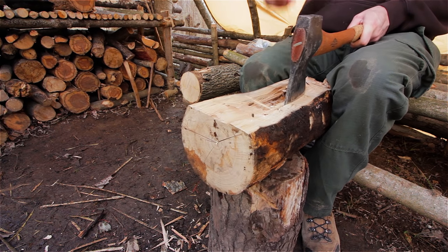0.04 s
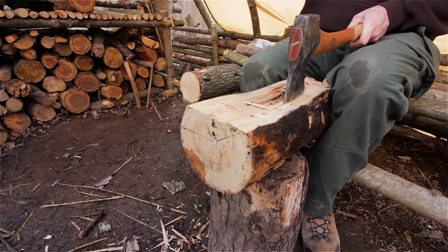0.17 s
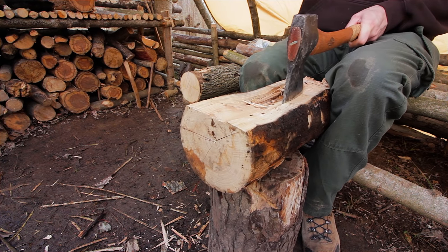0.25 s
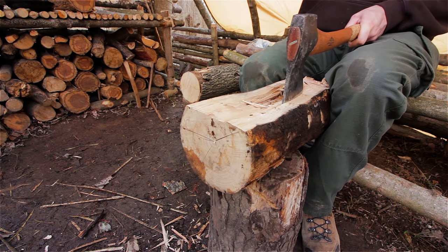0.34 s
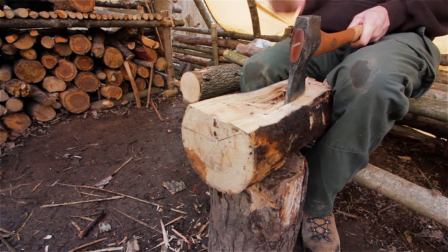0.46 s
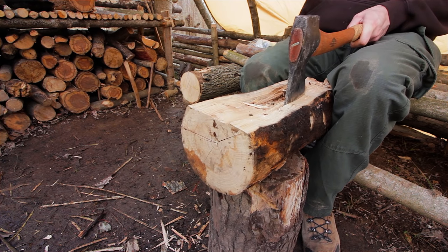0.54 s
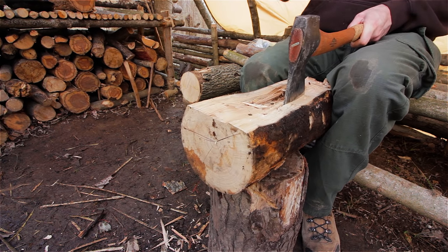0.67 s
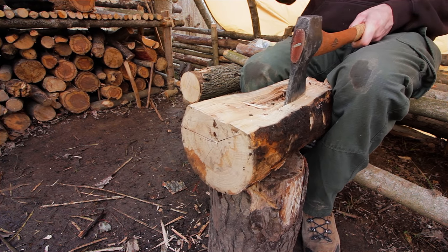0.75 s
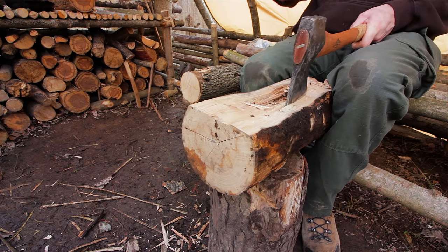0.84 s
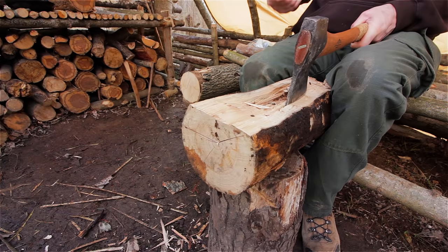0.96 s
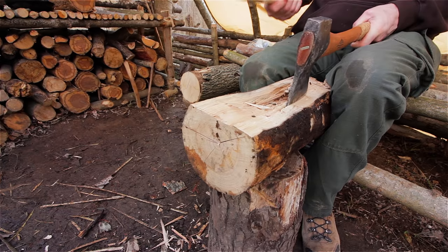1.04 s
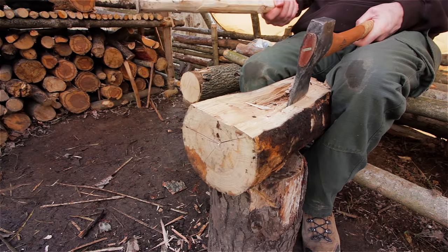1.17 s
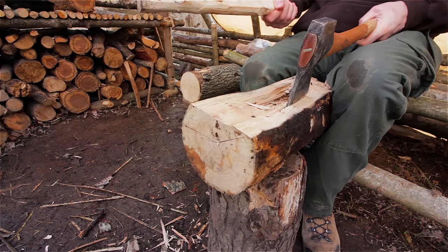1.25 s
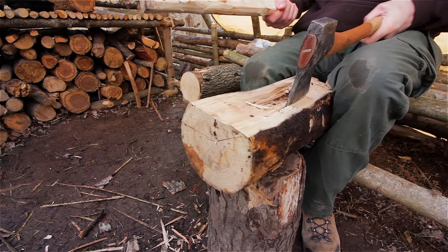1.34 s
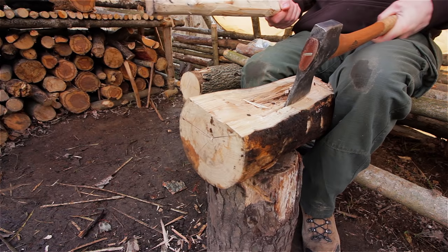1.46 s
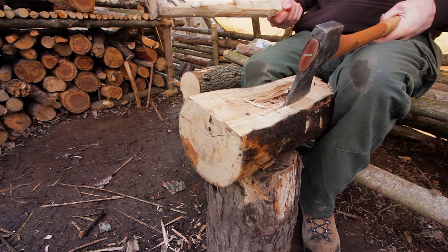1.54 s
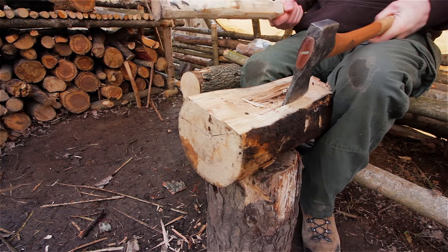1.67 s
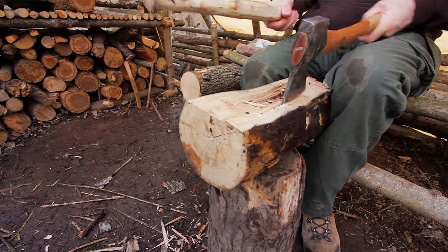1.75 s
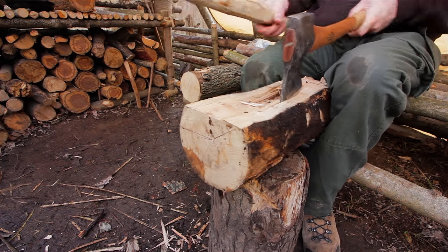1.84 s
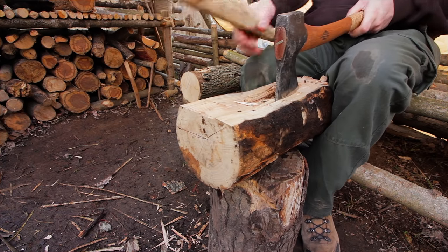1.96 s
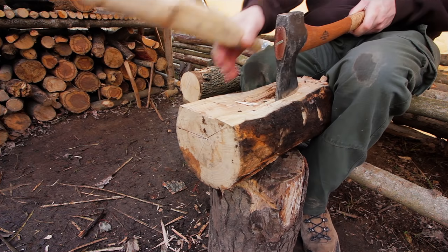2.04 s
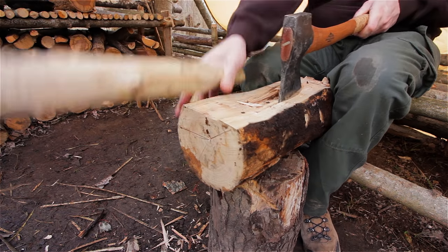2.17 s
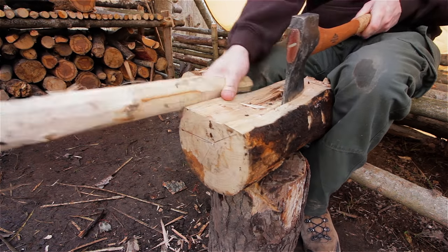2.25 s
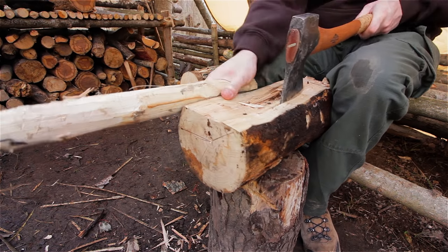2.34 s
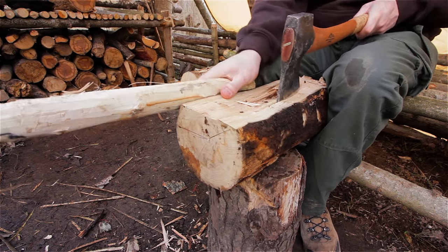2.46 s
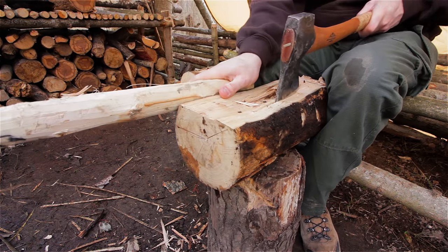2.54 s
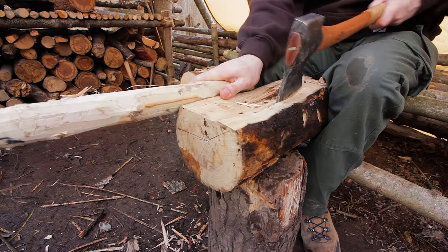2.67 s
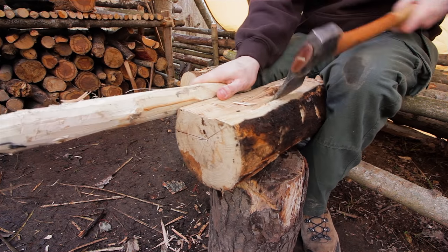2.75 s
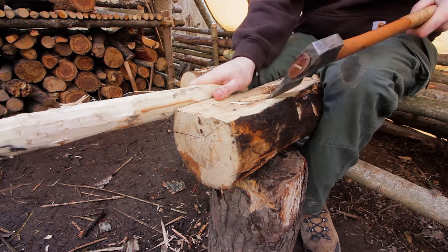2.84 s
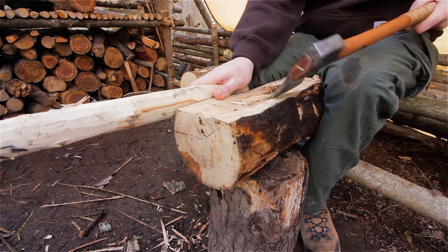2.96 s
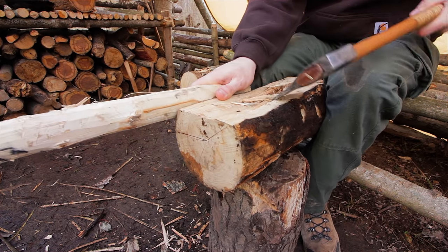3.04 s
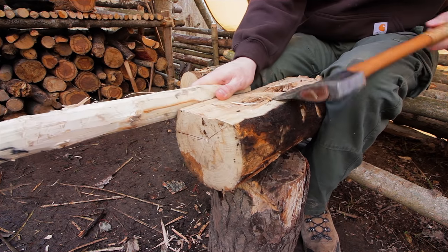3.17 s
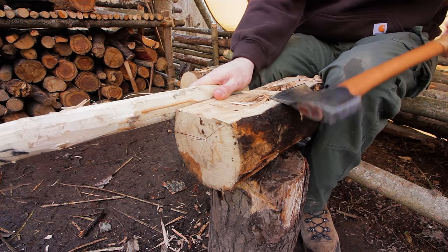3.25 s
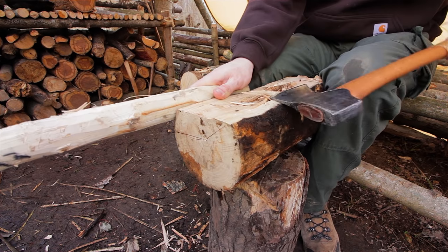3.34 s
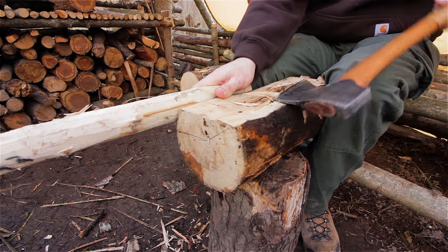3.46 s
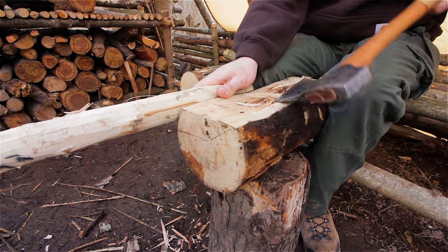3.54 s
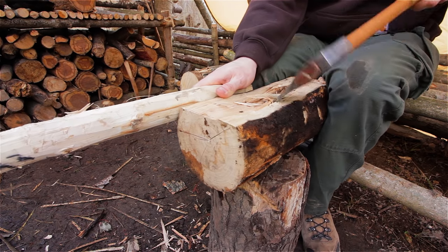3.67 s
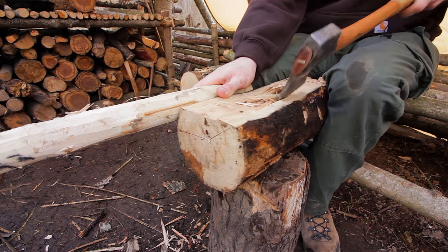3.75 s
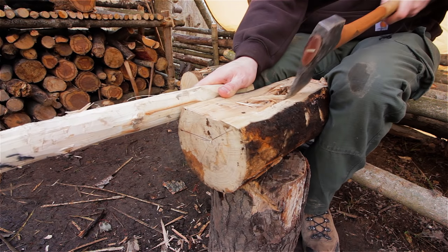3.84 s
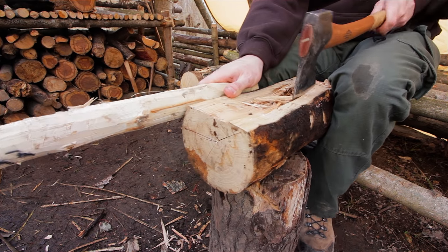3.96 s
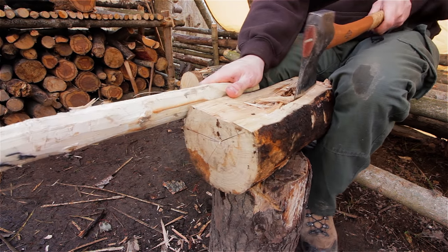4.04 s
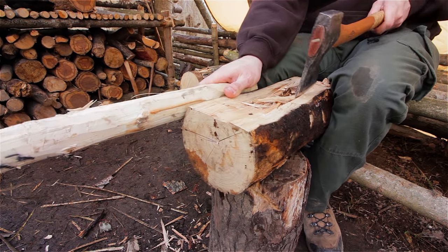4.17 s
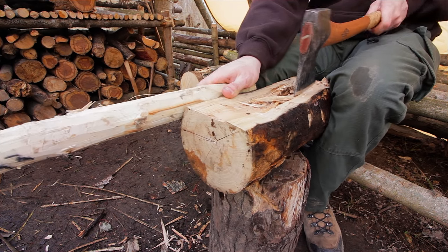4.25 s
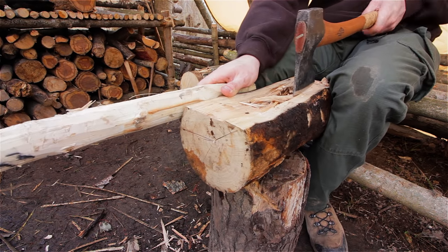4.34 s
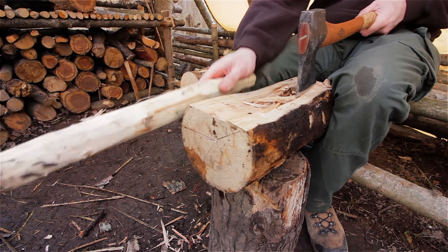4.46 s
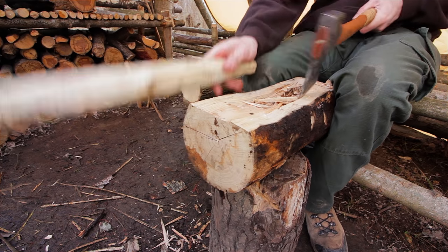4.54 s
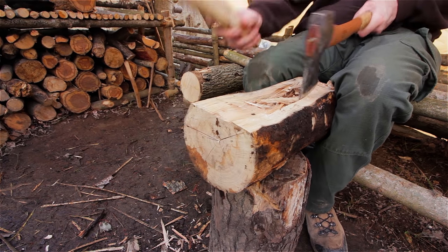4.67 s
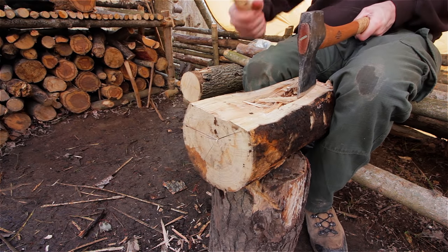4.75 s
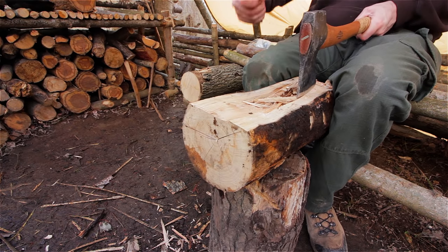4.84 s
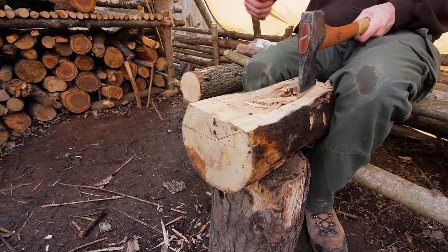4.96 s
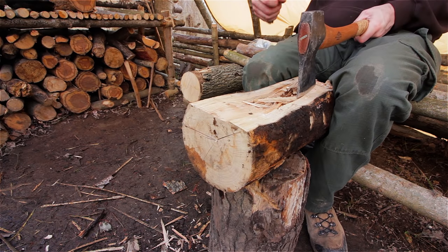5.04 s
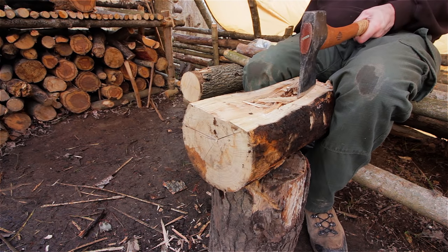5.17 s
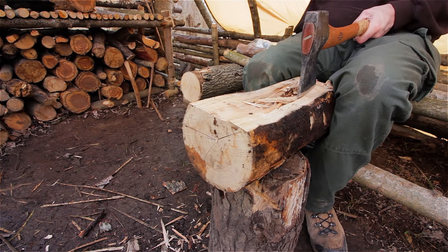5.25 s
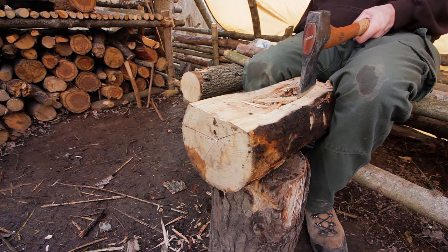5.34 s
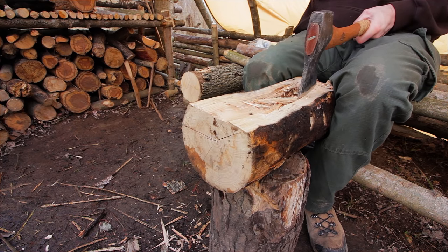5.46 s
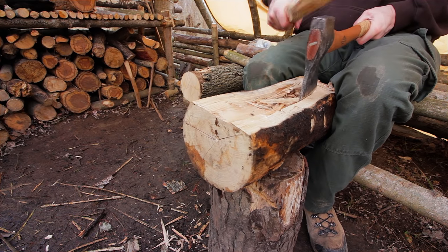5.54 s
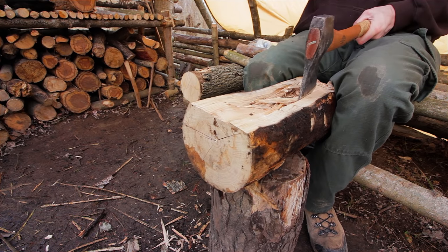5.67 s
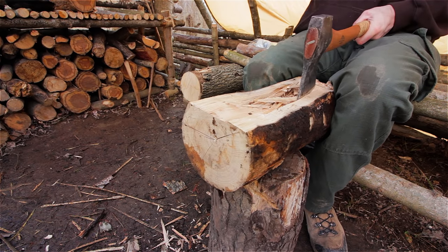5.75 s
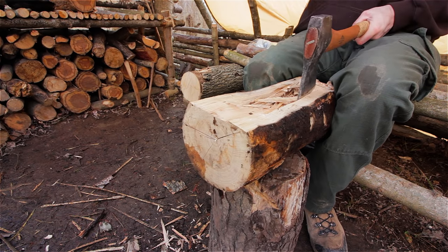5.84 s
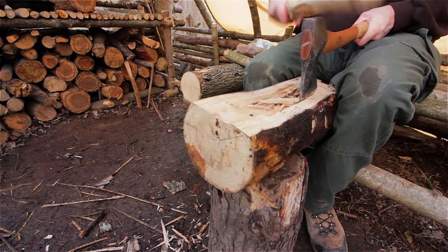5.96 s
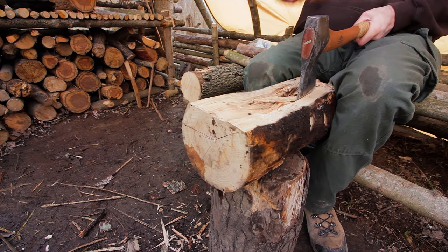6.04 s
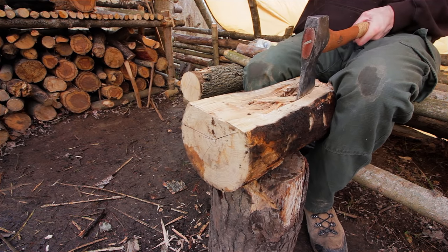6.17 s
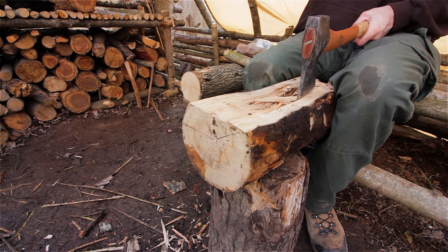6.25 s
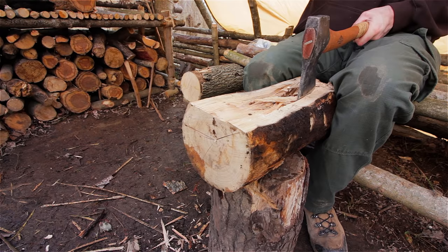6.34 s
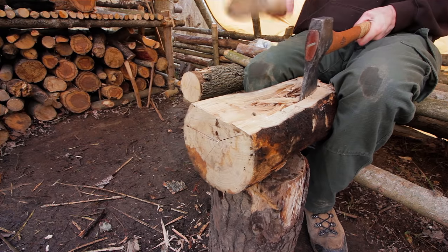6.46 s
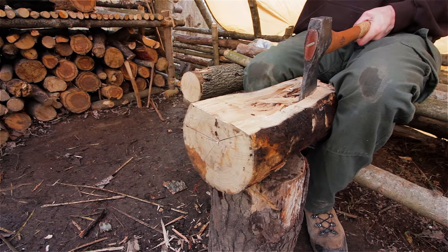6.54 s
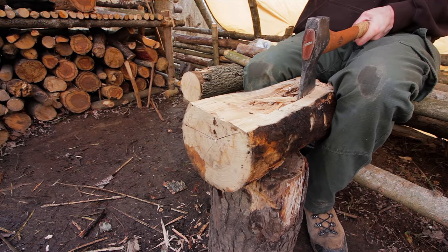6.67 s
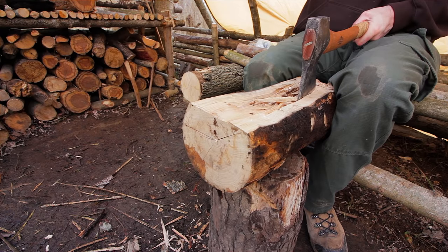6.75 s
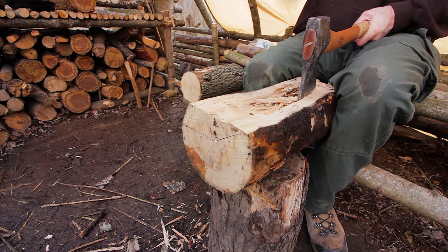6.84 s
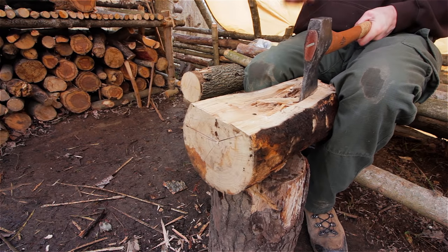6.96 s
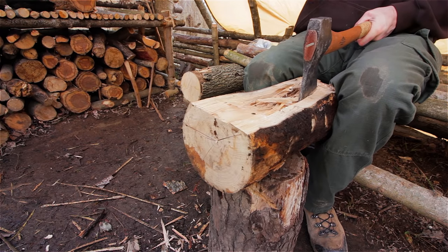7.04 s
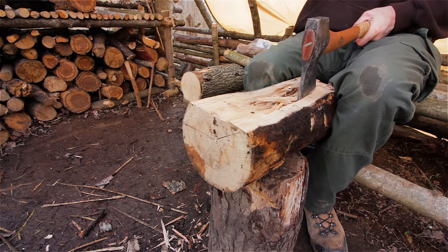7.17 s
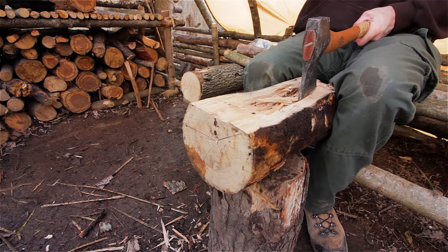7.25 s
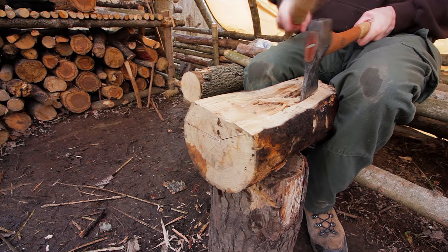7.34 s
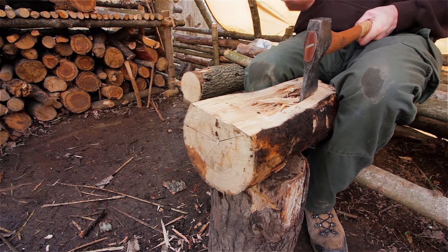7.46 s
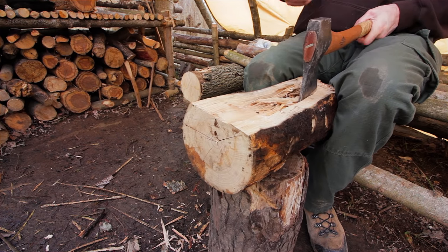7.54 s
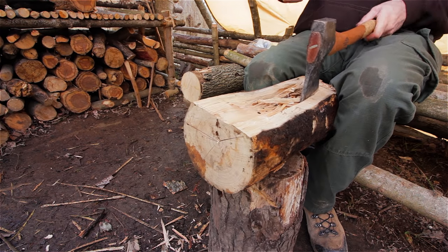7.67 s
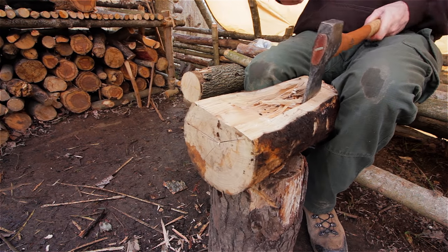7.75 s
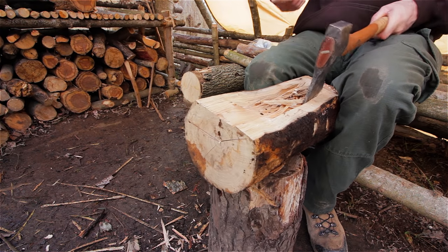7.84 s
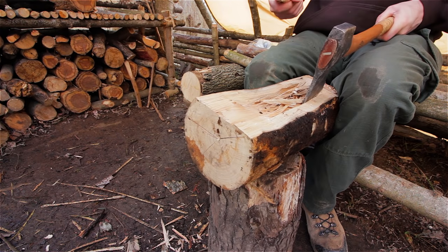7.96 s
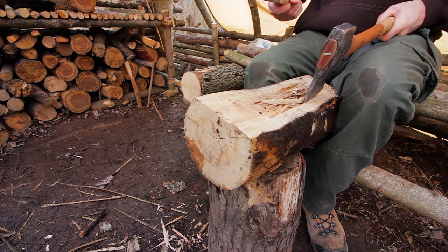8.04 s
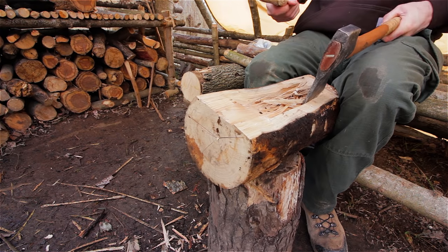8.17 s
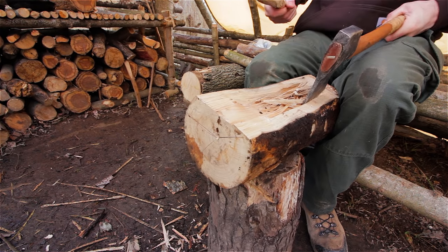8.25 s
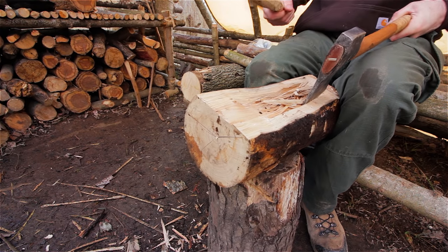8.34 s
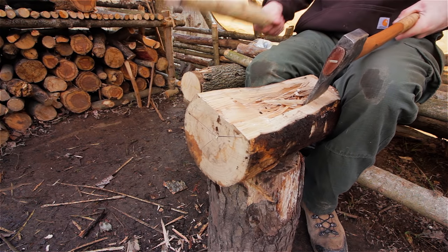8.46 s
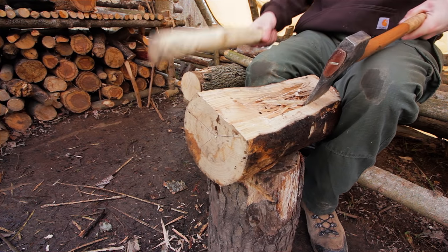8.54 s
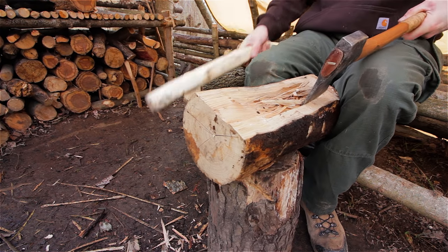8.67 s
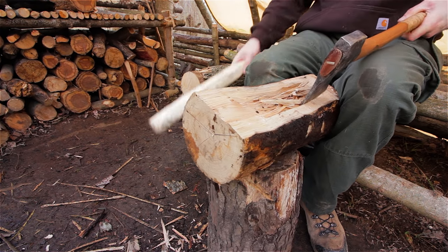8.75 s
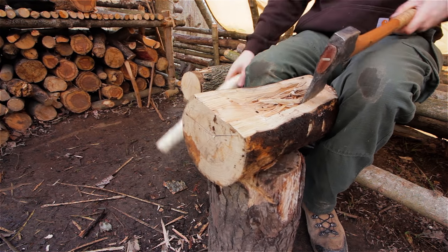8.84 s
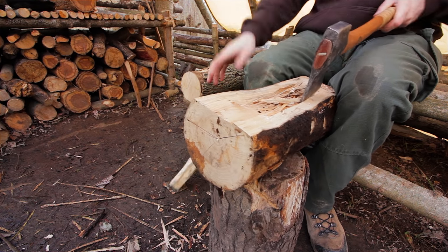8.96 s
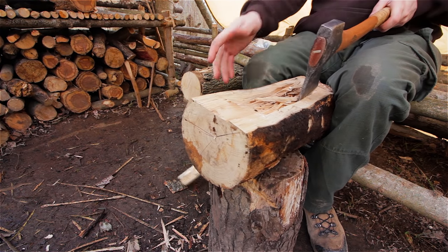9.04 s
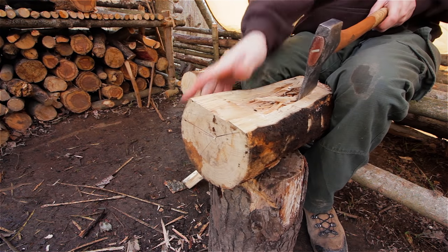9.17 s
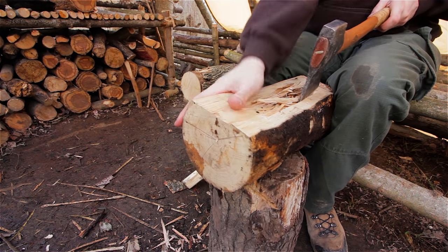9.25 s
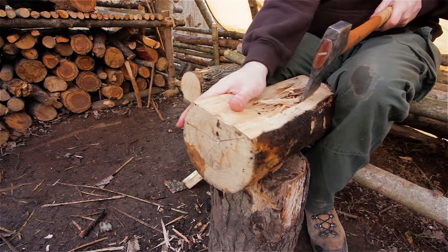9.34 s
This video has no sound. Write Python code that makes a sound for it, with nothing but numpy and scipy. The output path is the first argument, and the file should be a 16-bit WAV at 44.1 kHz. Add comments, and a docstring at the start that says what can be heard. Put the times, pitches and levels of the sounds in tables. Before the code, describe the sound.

The fading echo of an earlier blow leads into two hard wooden whacks at about 0.05 and 0.5 s, a baton driving a hatchet into a log. They are loud, short, mid-pitched and slightly overloaded, with dull shelter reflections and a diffuse tail from trees. The background ducks and slowly returns: faint rumble, low hum, cloth rustle. Tiny knocks come at 1.5-1.8 s, then a dull thud at 2.3 as the baton is laid down. Sharp splintering cracks burst at 2.7-2.85 s, with a faint blade scrape at 3.1 and more snaps around 3.25. Sleeve brushes and a soft hand slide follow until 5.2. Five more blows land near 5.6, 6.0, 6.5, 6.95 and 7.4 s. After quiet rustling, the baton drops at 9.05-9.25 with a knock and brighter, hollow clatter, and a brief rising squeak of the blade begins around 9.35.

```python
"""The last echo of a blow just past leads into two hard blows: a wooden baton drives a hatchet into a log.
The log, the baton and the blade's squeak are made of decaying or gliding tones; a chip levered out with
sharp cracks is bursts of noise. Five more blows follow, and the baton is dropped. Shaped noise makes the
cloth rustle, the distant rumble, the shelter's reflections and the echo from the trees. Blows overload the
sound, the gain ducks, and the background slowly returns."""
import sys
import numpy as np
from scipy import signal
from scipy.fft import rfft, irfft
from scipy.io import wavfile
from scipy.ndimage import uniform_filter1d

SR = 44100
rng = np.random.default_rng(int(sys.argv[2]) if len(sys.argv) > 2 else 0)


def ratio(d):
    """dB to gain"""
    e = np.asarray(d, float) / 20
    return 10 ** e


def unload_audio(sound):
    """Save the sound as a 16-bit wav file, at the path given as the first command line argument."""
    columns = np.transpose(np.atleast_2d(sound))
    # keep every value between -1 and 1, then stretch to whole-number steps
    steps = np.round(np.clip(columns, -1, 1) * 32767)
    wavfile.write(sys.argv[1], SR, steps.astype(np.int16))


N = 414540

# baton hitting the back of the hatchet: [t/s, force level/dB, rebound level/dB, sharpness level/dB]
HATCHET_BLOWS = [(0.0502, 27, -5, 3), (.4716, 24.5, -2, 1), (5.6056, 21, -8.5, 1), (6.04, 20.5, -3.5, -0.5),
                 (6.4742, 26, -6.5, -1.5), (6.9509, 24, -3.5, -3.5), (7.4057, 26.5, -4.5, -1.5)]
# ringing tones of log, stump and hatchet: [f/Hz, level/dB, t60/s before each touch scales it]
LOG_MODES = [(275.4, -11, 0.035), (394, -1.5, 0.099), (460, -4, 0.018), (560.5, 2.5, 0.059),
             (639, -1.5, 0.06), (775, -2.5, 0.088), (932.6, -2, 0.03), (1081, -3.5, 0.091),
             (1190, -4, 0.024), (1395, -2, 0.029), (1570, -6, 0.084), (1929, -5, 0.057),
             (2215, -4.5, 0.096), (2530, -10.5, 0.026), (3143, -13, 0.01), (3530, -8, 0.038),
             (4120, -18, 0.017), (7150, -19.5, 0.037)]
# colour of the contact noise in a blow: [f/Hz, level/dB per Hz]
SLAP_COLOUR = [(59, -36.5), (100, -20.5), (524, -3), (1830, -3.5), (2520, -10), (3540, -9), (3940, -21.5),
               (16000, -40)]
# ringing tones of the free baton: [f/Hz, level/dB, t60/s before the grip scales it]
BATON_MODES = [(205, -15, .3), (404, -15, .2), (560, -12, .08), (711, -6, .07), (931, 1, .22),
               (1066, 0, .13), (1308, -13, .12), (1480, -12, .12), (1922, -13, .16), (2196, -7, .1),
               (3150, -15, .07), (3450, -22, .07), (4490, -28, .05), (4780, -20, .05)]
# baton touching wood or soil: [t/s, level/dB, freedom to ring 0-1, contact cut-off f/Hz, log answer level/dB]
BATON_KNOCKS = [(1.481, -39, 0.5, 2000, 16), (1.548, -35, 1, 2000, 9), (1.789, -32, 0.7, 700, 4),
                (2.288, -11.5, 0.03, 1130, 11), (9.0549, -11, 0.16, 3180, 10.5), (9.156, 0.5, 1, 3340, -6),
                (9.191, -2, 0.76, 1460, -3.5), (9.244, -28, 0.66, 2920, -3)]
# a hand sliding along the baton: [t/s, length/s, level/dB]
HAND_SLIDES = [(4.745, .09, -38.5), (5.045, .085, -48)]
# wood fibres snapping: [t/s, level/dB before a common trim, centre f/Hz]
FIBRE_CRACKS = [(1.8873, -34.5, 9960), (1.9041, -36, 5940), (2.425, -29.5, 3986), (2.7076, -14, 3650),
                (2.7631, -21, 3830), (2.7741, -17.5, 8210), (2.79, -12.5, 5000), (2.7926, 9, 3460),
                (2.8009, -1, 5200), (2.805, -0.5, 3300), (2.8112, -4, 3380), (2.8144, -0.5, 2930),
                (2.8301, -10.5, 6770), (2.8334, -7, 4060), (2.844, 7, 6780), (3.2136, -28, 3440),
                (3.2454, -26, 7730), (3.2531, -10.5, 3545), (3.264, 5.5, 6200), (3.329, -21, 5000),
                (3.3555, -13, 5605), (3.6871, -32, 3036), (3.7467, -33, 3200), (3.9957, -23.5, 5100),
                (5.5271, -40, 3420), (5.9558, -30, 3153)]
# loudness curve of moving cloth and hands: [t/s, level/dB]
RUSTLE_LEVELS = [(1.2, -59.5), (2.7, -57.5), (3.4, -56.5), (5.55, -63.5), (9.4, -61)]
# colour of cloth noise: [f/Hz, level/dB per Hz]
CLOTH_COLOUR = [(150, -32), (250, -0.5), (1240, -6.5), (1760, -8), (2440, -7), (3120, -8), (16000, -19.5)]
# path of the blade's squeak in the cut: [t/s, strongest partial f/Hz, level/dB]
SQUEAK_PATH = [(9.33, 1231, -54), (9.354, 1457, -32.5), (9.368, 1614, -44), (9.376, 1666, -35),
               (9.398, 1674, -31)]
# tones stacked in the squeak: [multiple of the strongest partial, level/dB]
SQUEAK_STACK = [(.5, -12.5), (1.0, 1.5), (1.5, -22), (2.0, -30)]
# colour of the distant rumble: [f/Hz, level/dB per Hz]
RUMBLE_COLOUR = [(15, -23.5), (25, -3.5), (43, -5.5), (102, 1), (175, -13.5), (249, -13.5), (677, -12.5),
                 (887, -9.5), (2220, -17.5), (3250, -24.5), (8590, -29.5), (14800, -29), (16000, -32)]
# wavering drone: [f/Hz, width of each of two filters/Hz, level/dB]
DRONE_BANDS = [(78, 7.9, -57.5), (156, 110, -56.5)]
# colour of the echo from the trees: [f/Hz, level/dB per Hz]
WOODS_COLOUR = [(150, -53), (250, -22), (521, -10.5), (747, -9), (868, -11.5), (1040, -0.5), (1600, -10),
                (1920, -3.5), (2590, -17.5), (3250, -17.5), (3890, -29), (9000, -43.5), (11700, -74),
                (19800, -120)]
# brushes of sleeve and hand: [t/s at the middle, length/s, level/dB, brightest f/Hz]
SLEEVE_BRUSHES = [(1.518, .16, -48, 1710), (2.385, 0.049, -43, 3000), (2.564, .08, -40.5, 3200),
                  (3.87, 0.26, -50, 5030), (4.18, .09, -47.5, 3540), (4.374, 0.065, -46.5, 2480),
                  (4.461, .06, -43.5, 4070), (4.575, .14, -46.5, 3480), (4.818, 0.086, -43.5, 5000),
                  (5.2, .06, -52, 4070), (8.2, .1, -53, 900), (8.31, 0.12, -52, 1500),
                  (8.465, .08, -50, 1510), (8.66, 0.066, -48, 2480), (8.948, 0.15, -52, 4000),
                  (9.334, 0.055, -47.5, 3550)]
# blade dragged over the log: [t/s, length/s, level/dB, ring f/Hz]
BLADE_SCRAPES = [(3.12, .06, -44, 377), (3.139, .095, -45.5, 1310)]

# a blow just before the start still echoes and holds the gain down
EARLIER_BLOW_S, EARLIER_FORCE_DB, EARLIER_DUCK_DB = 0.42, 29, 32.5


def rms_one(x):
    """Scale to rms 1, so that a level in dB can be set afterwards."""
    return x / np.sqrt(np.mean(x ** 2) + 1e-20)


def coloured(spectrum, size):
    """Noise of rms 1 whose spectrum follows (Hz, dB) points."""
    hz, db = np.transpose(spectrum)
    grid = np.fft.rfftfreq(size, 1 / SR) + 1
    gain = ratio(np.interp(np.log(grid), np.log(hz), db))
    return rms_one(irfft(rfft(rng.standard_normal(size)) * gain, size))


def drift(rate):
    """Random wander: straight lines between 2 * rate random points a second, which have spread 1."""
    points = rng.standard_normal(int(N / SR * 100))
    return np.interp(np.arange(N) / SR * rate * 2, np.arange(len(points)), points)


def resonance(x, hz, width_hz):
    """A band around hz, as from a ringing body: two poles, gain 1 on top."""
    r = np.exp(-np.pi * width_hz / SR)
    feedback = [1, -2 * r * np.cos(2 * np.pi * hz / SR), r * r]
    return signal.lfilter([(1 - r * r) / 2, 0, (r * r - 1) / 2], feedback, x)


def low_pass(x, cut_hz):
    """Dull the sound above cut_hz with a second-order filter."""
    return signal.sosfilt(signal.butter(2, min(cut_hz, SR / 2.3), fs=SR, output="sos"), x)


def struck(modes, t, freedom, scatter_db, shift=0):
    """A struck body: decaying tones with new strengths for every touch; peak 1."""
    hz, db, t60 = np.transpose(modes)[:, :, None]
    strength = ratio(db + scatter_db * rng.standard_normal(hz.shape))
    hz = hz * (1 + shift * rng.standard_normal(hz.shape))   # grip and depth of the cut move the tones
    decay = ratio(-60 * t / (t60 * freedom))
    ring = (strength * decay * np.sin(2 * np.pi * hz * t)).sum(axis=0)
    return ring / np.abs(ring).max()


def add(out, s, sound):
    """Mix a sound in at time s."""
    at = round(s * SR)
    out[at:at + len(sound)] += sound[:len(out) - at]


def blows():
    """The log rings under the blow and its rebound, a slap of noise sits on top; air swishes before."""
    out, t = np.zeros(N), np.arange(SR // 4) / SR
    onset = 1 - np.exp(-t / 0.00042)
    for s, force_db, rebound_db, sharp_db in HATCHET_BLOWS:
        for lag_s, hit_db in (0, 0.0026), (0.0095, rebound_db):
            slap = ratio(sharp_db - 4.5) * coloured(SLAP_COLOUR, len(t)) * ratio(-60 * t / 0.028)
            ring = struck(LOG_MODES, t, 0.83, scatter_db=2.5, shift=0.03)
            add(out, s + lag_s, ratio(force_db + hit_db) * onset * (ring + slap))
        swish = coloured(CLOTH_COLOUR, size=2100) * ratio(-16.5 * np.linspace(1, 0, num=2100))
        add(out, s - len(swish) / SR, ratio(-43.5) * swish)
    return signal.sosfilt(signal.butter(4, 200, "high", fs=SR, output="sos"), out)


def baton():
    """Knocks ring as freely as the grip allows; the log answers, with contact grit and a low thump."""
    out, t = np.zeros(N), np.arange(SR // 2) / SR
    onset = 1 - np.exp(-t / 0.00066)
    grit_fade = ratio(-60 * t / 0.037) + ratio(5.5 - 60 * t / 0.0031)
    for s, level_db, freedom, cut_hz, log_db in BATON_KNOCKS:
        hiss = low_pass(rng.standard_normal(len(t)), 2 * cut_hz)
        grit = rms_one(resonance(hiss, cut_hz / 2, cut_hz)) * grit_fade
        grit = ratio(log_db - 16) * grit   # grit grows with the log's answer
        knock = struck(BATON_MODES, t, freedom, scatter_db=7.0)
        knock = knock + ratio(log_db) * struck(LOG_MODES, t, 0.5, scatter_db=2.5)
        # hard landings shake the soil
        thump = ratio(-27 + log_db - 9000 / cut_hz) * np.sin(2 * np.pi * 45 * t) * ratio(-60 * t / 0.18)
        add(out, s, onset * ratio(level_db) * (low_pass(knock, cut_hz) + grit + thump))
    return out


def faint_ticks():
    """Faint ticks of bark and chips at random moments, centred between 3 and 6 kHz."""
    ticks_per_s, softest_db, mean_extra_db = 3.0, -48, 1
    chance = rng.random((round(ticks_per_s * N / SR), 3))
    return [(s * N / SR, softest_db - mean_extra_db * np.log(1 - size), 3000 * 2 ** hue)
            for s, size, hue in chance]


def cracks():
    """Each snap is a noise burst, partly in a resonance; each also taps the log, dense splinters follow."""
    out, tearing, t = np.zeros(N), np.zeros(N), np.arange(SR // 8) / SR
    snap_fade = ratio(-60 * t / 0.004) + ratio(-14 - 60 * t / 0.024)
    for s, level_db, hz in FIBRE_CRACKS + faint_ticks():
        white = rng.standard_normal(len(t))
        colour = rms_one(resonance(white, hz, hz / 5)) + 0.5 * rms_one(resonance(white, 4000, 9000))
        tap = ratio(-16.5 + 0.1 * level_db) * struck(LOG_MODES, t, 0.4, scatter_db=7.0)
        add(out, s, ratio(level_db - 2.0) * (colour * snap_fade + tap))
        # fibres go on tearing after each snap, at half its dB
        add(tearing, s, ratio(-24 + 0.5 * level_db - 60 * t / 0.074) * (1 - np.exp(-t / 0.0038)))
    sizes = ratio(4 * np.minimum(rng.exponential(1, N), 4)) * rng.choice([-1, 1], N)
    splinters = sizes * (rng.random(N) < 1200 / SR)   # about 1200 a second
    splinters = resonance(splinters, 3400, 1500) + 0.6 * resonance(splinters, 4800, 6000)
    return out + tearing * rms_one(splinters)


def squeak():
    """The blade sticks and slips in the cut: a gliding stack of partials, uneven in level."""
    s, hz, db = np.transpose(SQUEAK_PATH)
    t = np.arange(N) / SR
    pitch_hz = np.interp(t, s, hz) * (1 + 0.0098 * drift(45))
    phase = 2 * np.pi * np.cumsum(pitch_hz) / SR
    stack = sum(ratio(level) * np.sin(k * phase) for k, level in SQUEAK_STACK)
    level = ratio(np.interp(t, s, db, left=-120) + 1.5 * drift(48))
    roughness = 1 + 0.5 * rms_one(low_pass(rng.standard_normal(N), 250))
    return np.sqrt(2) * stack * level * roughness


def rub(length_s):
    """Uneven friction noise: its level jumps every 120 samples."""
    unevenness = ratio(2.5 * np.repeat(rng.standard_normal(100), 120))
    return (rng.standard_normal(12000) * unevenness)[:round(length_s * SR)]


def slides():
    """A palm rubs noise into the upper tones of the baton, with a lift toward the treble."""
    out = np.zeros(N)
    for s, length_s, db in HAND_SLIDES:
        noise = rub(length_s)
        rung = np.zeros(len(noise))
        for hz, mode_db, _ in BATON_MODES:
            if hz > 800:
                band = resonance(resonance(noise, hz, 0.04 * hz), hz, 0.04 * hz)
                rung += ratio(0.9 * mode_db) * np.sqrt(hz) * rms_one(band)
        add(out, s, ratio(db) * np.sqrt(np.hanning(len(noise))) * rms_one(rms_one(rung) + noise / 8))
    return out


def scrapes():
    """The dragged blade rubs noise into a resonance of the log."""
    out = np.zeros(N)
    for s, length_s, db, hz in BLADE_SCRAPES:
        noise = rub(length_s)
        rung = rms_one(resonance(noise, hz, 120))
        add(out, s, ratio(db) * np.sqrt(np.hanning(len(noise))) * rms_one(rung + noise / 8))
    return out


def bumps():
    """Knees and hands nudge the log: soft dull taps at random moments, as lively as the rustle."""
    bumps_per_s, over_rustle_db, cut_hz = 11, 19, 640
    out, t = np.zeros(N), np.arange(SR // 8) / SR
    for s, size in rng.random((round(bumps_per_s * N / SR), 2)) * [N / SR, 1]:
        db = np.interp(s, *np.transpose(RUSTLE_LEVELS)) + over_rustle_db - 1.0 * np.log(1 - size)
        tap = struck(LOG_MODES, t, 0.8, scatter_db=6.5, shift=0.08)
        add(out, s, ratio(db) * low_pass(low_pass(tap, cut_hz), cut_hz))
    return out


def brushes():
    """Short swells of grainy cloth noise, each with its own bright region."""
    out = np.zeros(N)
    for s, length_s, db, hz in SLEEVE_BRUSHES:
        fine = 5.2 * np.repeat(rng.standard_normal(400), 40)
        coarse = 1.8 * np.repeat(rng.standard_normal(32), 500)
        cloth = coloured(CLOTH_COLOUR, size=16000) * ratio(fine + coarse)
        cloth = rms_one(cloth + rms_one(resonance(cloth, hz, hz / 3)))[:round(length_s * SR)]
        add(out, s - length_s / 2, ratio(db) * np.hanning(len(cloth)) ** 0.4 * cloth)
    return out


def shelter(x):
    """Quick dull reflections from the walls and woodpile: fading noise that starts after 4 ms."""
    level_db, t60_s, cut_hz = -20, 0.12, 5800
    t = np.arange(SR // 3) / SR
    reflections = low_pass(rng.standard_normal(len(t)), cut_hz) * ratio(-60 * t / t60_s) * (t > 0.004)
    return signal.fftconvolve(x, ratio(level_db) * reflections / np.linalg.norm(reflections))[:N]


def echoes():
    """Countless trunks scatter each blow back as a long diffuse tail."""
    level_db, t60_s = -54, 1.61
    out, t = np.zeros(N + SR), np.arange(2 * SR) / SR   # one spare second ahead for the earlier blow
    for s, force_db, *_ in [(-EARLIER_BLOW_S, EARLIER_FORCE_DB)] + HATCHET_BLOWS:
        near = coloured(SLAP_COLOUR, len(t)) * ratio(10.0 - 60 * t / 0.53)   # the closest trunks keep the treble
        far = coloured(WOODS_COLOUR, len(t)) * ratio(-60 * t / t60_s)
        add(out, s + 1, ratio(force_db + level_db) * (near + far) * (1 - np.exp(-t / 0.01)))
    return out[SR:]


def rumble():
    """Distant rumble: shaped noise whose level wanders slowly."""
    return ratio(-51 + 1.0 * drift(1.0)) * coloured(RUMBLE_COLOUR, N)


def drone():
    """Wavering drone: one noise through narrow bands, each filtered twice."""
    white, out = rng.standard_normal(N), np.zeros(N)
    for hz, width_hz, db in DRONE_BANDS:
        band = rms_one(resonance(resonance(white, hz, width_hz), hz, width_hz))
        out += ratio(db + 0.65 * drift(0.97)) * band
    return out


def rustle():
    """Cloth rubs in countless small grains: noise with an uneven level and wandering bright bands."""
    s, db = np.transpose(RUSTLE_LEVELS)
    grain = ratio(1.8 * np.minimum(rng.exponential(1, N), 6))
    cloth = rms_one(coloured(CLOTH_COLOUR, N) * uniform_filter1d(grain, size=20))
    folds = np.zeros(N)
    for hz in (700, 1900, 3200, 5200):   # folds brighten patch by patch
        folds += ratio(-8.5 + 2.6 * drift(7.7)) * rms_one(resonance(cloth, hz, hz / 4))
    return ratio(np.interp(np.arange(N) / SR, s, db) + 2.5 * drift(4.1)) * (cloth + folds)


def scene():
    """All sources with their echoes."""
    near = blows() + baton() + cracks() + squeak() + slides() + scrapes() + bumps()
    return (near + shelter(near) + brushes() + echoes() + rumble() + drone() + rustle())[None]


def roll_off(x):
    """The treble ends steeply here."""
    return signal.sosfilt(signal.butter(12, 16470, fs=SR, output="sos"), x)


def record(dry):
    """Gain control ducks on loud sound and recovers at a steady rate; the first milliseconds overload."""
    threshold_db, release_db_per_s = -15.5, 33
    detector_s, attack_s, reaction_s = 0.012, 0.011, 0.0025
    t = np.arange(N) / SR
    r = np.exp(-1 / (detector_s * SR))
    level_db = 10 * np.log10(signal.lfilter([1 - r], [1, -r], dry[0] ** 2) + 1e-12)
    excess = np.maximum(level_db - threshold_db, 0)
    excess[0] = EARLIER_DUCK_DB - release_db_per_s * EARLIER_BLOW_S
    # hold each peak, letting it fall in a straight line of dB
    held = np.maximum.accumulate(excess + release_db_per_s * t) - release_db_per_s * t
    r = np.exp(-1 / (attack_s * SR))
    duck_db = signal.lfilter([1 - r], [1, -r], held, zi=[held[0] * r])[0]
    duck_db = np.interp(t - reaction_s, t, duck_db)   # the gain starts to fall late
    overloaded = np.clip(dry * ratio(-duck_db), -1, 1)
    return roll_off(overloaded)


dry = scene()
out = record(dry)
unload_audio(out)
```